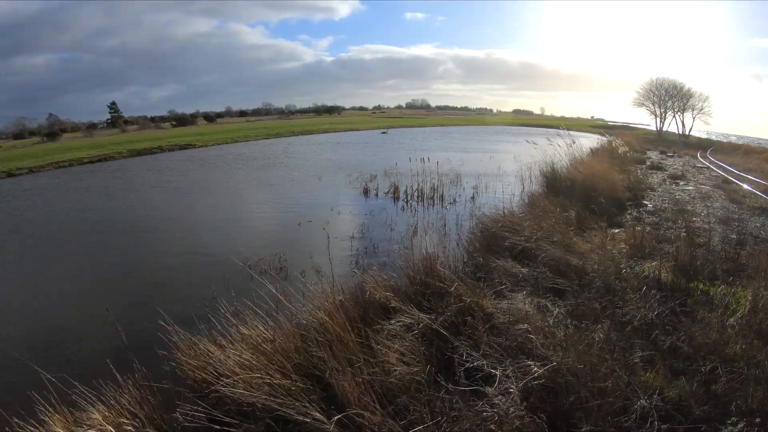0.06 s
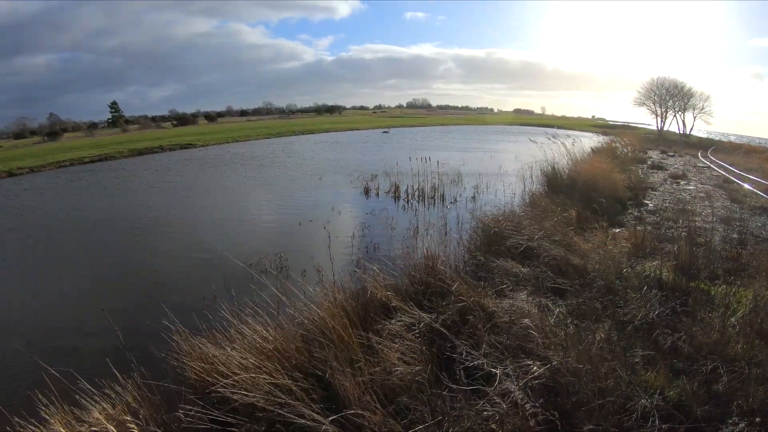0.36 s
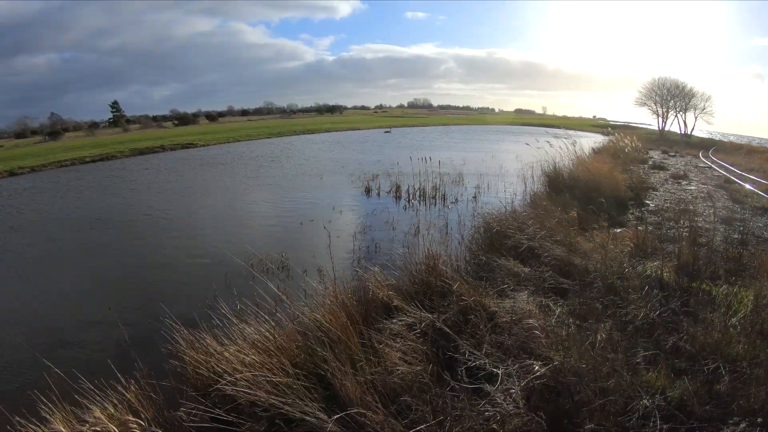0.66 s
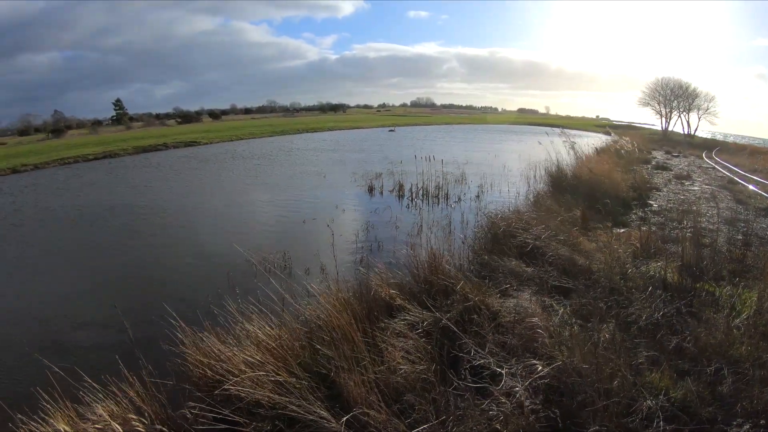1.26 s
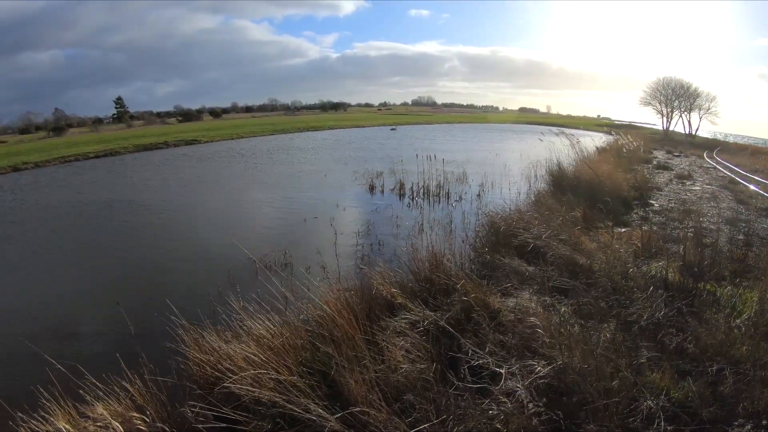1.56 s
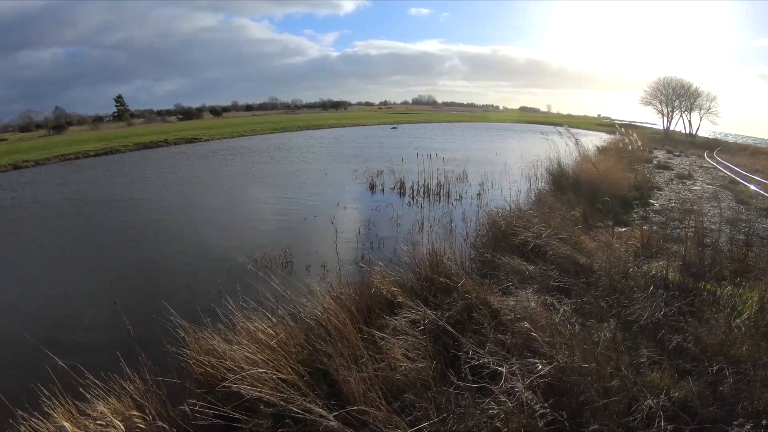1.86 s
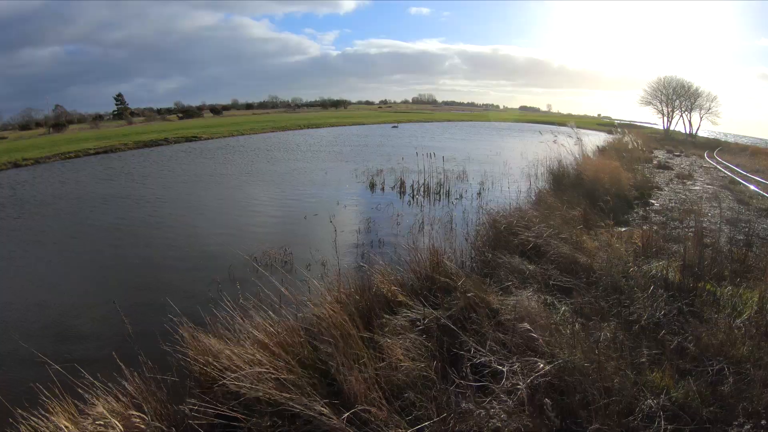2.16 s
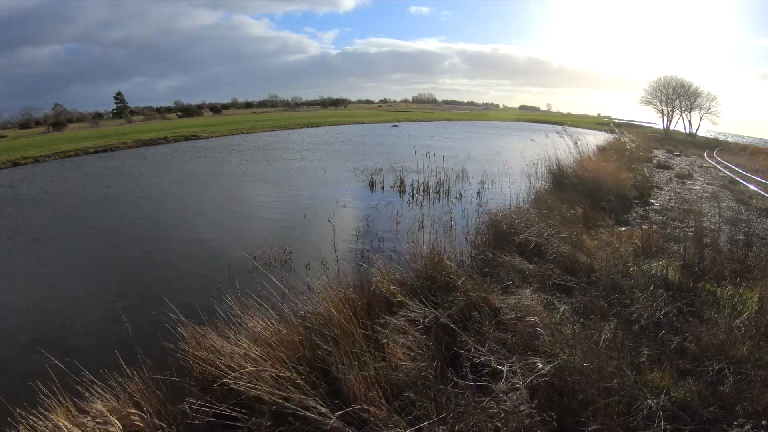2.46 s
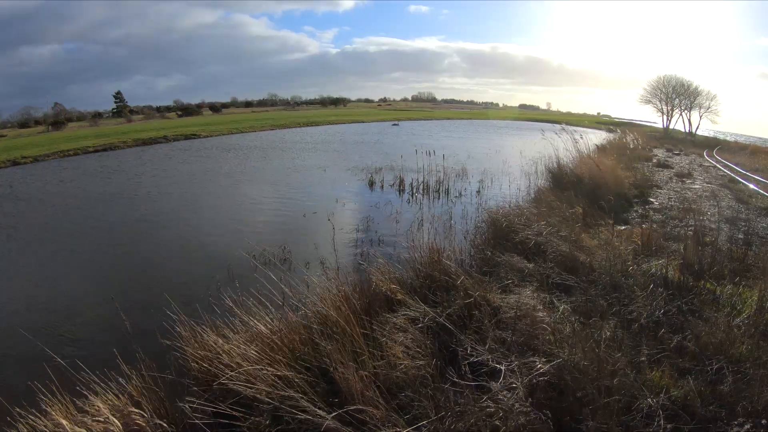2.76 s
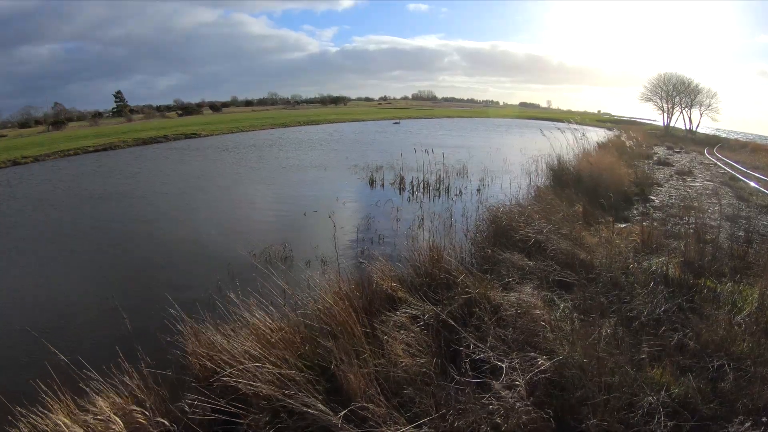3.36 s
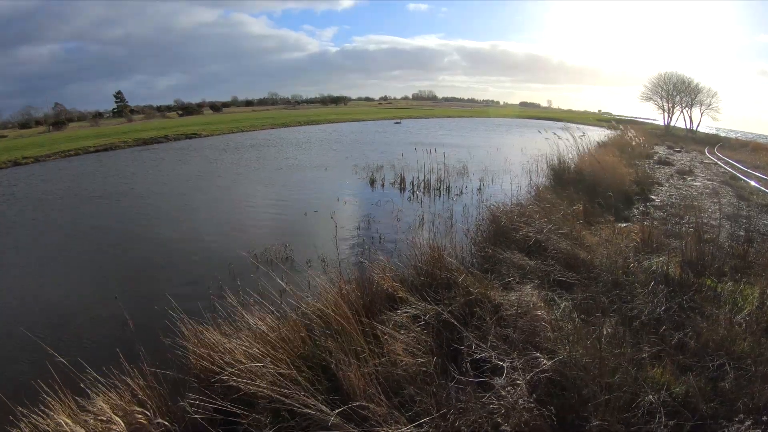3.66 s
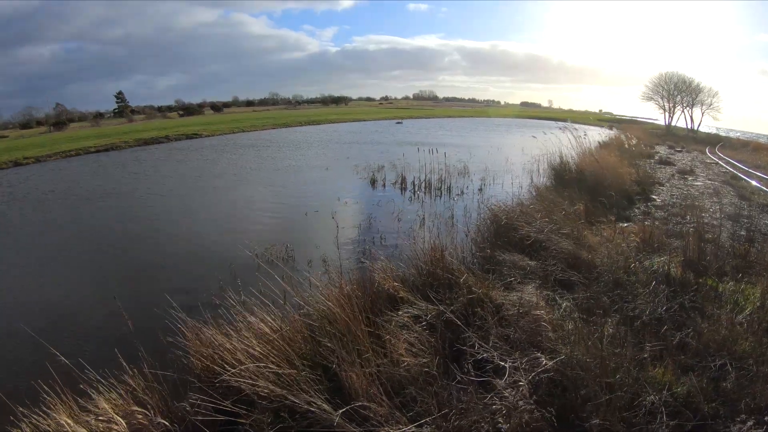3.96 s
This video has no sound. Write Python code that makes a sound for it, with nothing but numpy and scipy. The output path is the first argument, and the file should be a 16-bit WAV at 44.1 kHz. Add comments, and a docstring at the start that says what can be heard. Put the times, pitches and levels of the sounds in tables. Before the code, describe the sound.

Wind rumbles and thumps unevenly on the microphone over a constant rush of air beside a pond. Underneath, dry grass hisses and crackles softly, with a few faint reed ticks before the wind eases slightly.

```python
"""Wind on a grassy shore

Steady wind crosses open ground beside a pond. Turbulent air rushes over land and water, and dry
grass hisses by friction and crackles as it sways. In the stronger wind a dry reed stalk close by
ticks and scrapes. In front, eddies buffet the microphone with a rumble and low thumps."""
import sys
import numpy as np
from scipy import signal
from scipy.fft import rfft, irfft
from scipy.io import wavfile
from scipy.ndimage import map_coordinates

SR = 44100
rng = np.random.default_rng(int(sys.argv[2]) if len(sys.argv) > 2 else 0)


def wav_out(sig):
    """Save sig, one row per channel (or a flat mono array), as 16-bit PCM at SR to the path in sys.argv[1]."""
    wavfile.write(sys.argv[1], SR, np.round(np.clip(np.atleast_2d(sig).T, -1, 1) * 32767).astype(np.int16))


N = 176400


def undb(db):
    """Amplitude grows tenfold for every 20 dB of level."""
    return 10 ** (np.asarray(db) / 20)


def unit(x):
    """Normalisation to an rms of 1."""
    return x / np.sqrt(np.mean(x ** 2) + 1e-18)


def curve(rows):
    """Linear interpolation of (time [s], value) rows."""
    return np.interp(np.arange(N) / SR, *np.array(rows).T)


def colour(x, spectrum):
    """Spectral shaping by (frequency [Hz], gain [dB]) rows, normalised to an rms of 1."""
    hz, db = np.array(spectrum).T
    bin_hz = np.maximum(np.arange(len(x) // 2 + 1) * SR / len(x), 1)
    gain = undb(np.interp(np.log(bin_hz), np.log(hz), db))
    return unit(irfft(rfft(x) * gain, len(x)))


def noise(spectrum):
    """Filtered Gaussian noise, the sum of many independent sources."""
    return colour(rng.standard_normal(N), spectrum)


def waver(per_s):
    """Slow random modulation: a spline through per_s values a second, with an rms of 1."""
    return unit(map_coordinates(rng.standard_normal(2048), [np.arange(N) / SR * per_s], mode="wrap"))


def contacts(per_s, spread_db):
    """A Poisson process of tiny impacts, most weak and a few strong."""
    size = undb(spread_db * np.minimum(rng.exponential(size=N), 3))
    return (rng.random(N) < per_s / SR) * size * rng.choice([-1, 1], N)


def bursts(events, spectrum):
    """Noise pulses under Gaussian envelopes; each duration is the full width at half power."""
    out = np.zeros(N)
    for at, db, duration, pitch in events:
        span = slice(max(int((at - .15) * SR), 0), int((at + .15) * SR))
        t = np.arange(N)[span] / SR - at
        envelope = 2 ** (-2 * np.minimum((t / duration) ** 2, 20))
        carrier = colour(rng.standard_normal(16384), np.array(spectrum) * [pitch, 1])[:len(t)]
        out[span] += undb(db) * unit(carrier * envelope) * np.sqrt(np.mean(envelope ** 2))
    return out


def air_rush():
    """Distant turbulence radiates broadband noise whose half-octave bands fluctuate independently."""
    # air over land and water (frequency [Hz], spectral level [dB])
    spectrum = [(80, -21), (250, 2.5), (500, -0.5), (800, -1.5), (1150, -6.5), (1500, -10), (2200, -17),
                (3500, -18.5), (6000, -33), (15000, -84)]
    # strength of the rush (time [s], level [dB])
    level = [(0, -36.5), (.1, -39), (.25, -36.5), (.42, -37), (.58, -39.5), (.76, -37), (.93, -38),
             (1.07, -36), (1.22, -37.5), (1.5, -35.5), (1.95, -37), (2.12, -38), (2.33, -33.5), (2.44, -36),
             (2.56, -34.5), (2.74, -37), (3.04, -36), (3.28, -38), (3.48, -39), (3.72, -37.5), (3.95, -38)]
    # brightness as swells pass (time [s], treble lift [dB])
    tilt = [(0, 1), (1.1, 2), (2, 1), (2.6, -1.4), (3.4, 1.5), (3.7, 4), (4, 0.5)]
    air, tilt_db = rfft(noise(spectrum)), curve(tilt)
    bin_hz = np.maximum(np.arange(len(air)) * SR / N, 1)
    half_octaves = np.clip(2 * np.log2(bin_hz / 200), 0, 9)
    out = np.zeros(N)
    for band in range(10):
        share = np.maximum(1 - abs(half_octaves - band), 0)
        treble_weight = np.clip((band - 2) / 4, 0, 1)
        out += irfft(air * share, N) * undb(.5 * waver(per_s=7.77) + treble_weight * tilt_db)
    return unit(out) * undb(curve(level) + 3.5)


def dry_grass():
    """Friction of countless blades sums to a flickering hiss; nearer blades snap as single impulses."""
    # rubbing blades (frequency [Hz], spectral level [dB])
    hiss_spectrum = [(1200, -10), (2200, -8.5), (2750, 0.5), (3300, -5.5), (4200, -1), (5500, -5.5),
                     (6800, -6.5), (8200, -13.5), (10000, -13), (12500, -24.5), (15500, -32)]
    # strength of their hiss (time [s], level [dB])
    hiss_level = [(0, -49.5), (.6, -50.5), (1.05, -49.5), (1.45, -48.5), (1.7, -51.5), (1.92, -48.5),
                  (2.15, -49.5), (2.35, -48.5), (2.8, -50.5), (3.3, -49.5), (3.7, -50.5), (4, -50)]
    # thinnest blades and seed heads (frequency [Hz], spectral level [dB])
    fine_spectrum = [(4000, -20), (7000, 2), (10000, -1.5), (12500, -5.5), (15500, -13)]
    # strength of the fine hiss and the snaps (time [s], level [dB])
    fine_level = [(0, -55), (.45, -60.5), (1, -57), (1.2, -60), (1.42, -57), (1.65, -58.5), (1.93, -56),
                  (2.15, -57.5), (2.52, -55), (2.9, -58), (3.3, -59), (3.7, -62), (4, -60)]
    # snap of one blade (frequency [Hz], spectral level [dB])
    snap_spectrum = [(500, -40), (2000, -12), (5000, 1), (9000, 7), (12000, -3), (15500, -5)]
    flicker = undb(.94 * waver(per_s=37))
    hiss = noise(hiss_spectrum) * undb(curve(hiss_level) + 3.5)
    snaps = colour(contacts(per_s=70, spread_db=6.5), snap_spectrum) * undb(-7.5)
    fine = (noise(fine_spectrum) * undb(3.5) + snaps) * undb(curve(fine_level))
    return (hiss + fine) * flicker


def reed_stalk():
    """Impact and friction excite a stalk's resonances: ticks, each a crack within a rub, and scraping."""
    # response of the stalk (frequency [Hz], gain [dB])
    body = [(500, -45), (1200, -26), (2100, -5), (2700, -5.5), (3300, 1), (3950, 3), (4550, -2),
            (5300, -21.5), (8000, -17), (16000, -60)]
    # ticks (time [s], level [dB], duration [s], frequency ratio)
    ticks = [(.446, -37, .008, 1.05), (.4572, -39, 0.0035, 1.2), (.54, -33, .0032, 1.07),
             (1.048, -36, .005, .9), (1.07, -42, .0036, 0.91), (1.116, -39, .003, 1.03),
             (1.2358, -35, .004, .9), (1.2827, -31, .0016, 0.93), (1.287, -35, 0.0018, 1),
             (1.3095, -32, 0.0019, 1), (1.3185, -32.5, .003, 1.05), (1.406, -36, 0.0054, 0.99),
             (1.412, -38, .0043, 0.85), (1.733, -36, 0.011, 0.88), (1.743, -34.5, 0.0032, 1.06),
             (2.006, -35, .0037, 0.98), (2.0223, -35.5, .0036, 1), (2.047, -34.5, .0035, 1.1),
             (2.2082, -36, 0.0016, 1.2), (2.306, -40, .0061, 1.1), (2.3132, -27.5, 0.0013, 0.89),
             (2.37, -32, 0.0029, 1.03), (2.426, -33.5, .0018, 1.05)]
    # scraping, which fades as the wind drops (time [s], level [dB])
    scrape_level = [(0, -68), (.38, -57), (.5, -45), (.65, -53), (1.08, -54), (1.4, -49), (1.65, -54.5),
                    (2, -45), (2.38, -56), (2.5, -59), (4, -58)]
    drag = undb(curve(scrape_level) + 2 * waver(per_s=25.18))
    scrape = colour(contacts(per_s=600, spread_db=2), body) * drag
    impulses = np.zeros(N)
    for at, db, *_ in ticks:
        impulses[int(at * SR)] = undb(db)
    cracks = colour(impulses, body) * undb(-58)
    rubs = bursts(ticks, body) * undb(-2.5)
    return cracks + rubs + scrape


def buffeting():
    """Turbulent pressure on the microphone rumbles and thumps; smaller eddies sound higher."""
    # strength of the wind at the microphone (time [s], level [dB])
    wind_level = [(0, -22.5), (.18, -22), (.32, -20), (.6, -20.5), (.8, -23.5), (.92, -17.5), (1.2, -22.5),
                  (1.38, -19), (1.6, -21.5), (1.95, -19.5), (2.36, -21), (2.5, -25), (2.66, -25.5),
                  (2.88, -25), (3.05, -22.5), (3.2, -23), (3.33, -27), (3.42, -19), (3.53, -24.5),
                  (3.7, -20.5), (3.83, -25.5), (4, -25.5)]
    # rumble of the flow (frequency [Hz], spectral level [dB])
    rumble_spectrum = [(12, -33), (22, -19), (40, 1), (65, -3), (100, -3.5), (160, -11), (300, -20.5),
                       (600, -37.5), (1500, -40.5), (4000, -67), (16000, -110)]
    # small, fast whirls (frequency [Hz], spectral level [dB])
    whirl_spectrum = [(40, -35), (110, -1), (170, 1), (250, -6), (420, -11.5), (700, -21.5), (2000, -53),
                      (16000, -100)]
    # strong eddies (time [s], level [dB], duration [s], frequency ratio)
    eddies = [(.28, -13, 0.039, 1.2), (.347, -10.5, .016, 1.83), (.485, -16.5, 0.057, 1.97),
              (.591, -13, 0.022, 0.8), (.715, -13.5, 0.026, 0.84), (.927, -12, 0.04, 0.5),
              (1.14, -21, 0.028, 4.2), (1.145, -7.5, 0.02, 1.16), (1.374, -10.5, 0.049, 0.964),
              (1.437, -14.5, 0.012, 1), (1.46, -28.5, 0.089, 5.3), (1.489, -14.5, 0.024, 1.3),
              (1.702, -13.5, 0.017, 0.83), (1.892, -14, 0.036, 0.81), (2.027, -14.5, 0.045, 0.67),
              (2.159, -11, 0.026, 0.81), (2.162, -18, 0.016, 3.9), (2.336, -11, 0.02, 1.04),
              (2.63, -20.5, .025, 1.1), (2.76, -22, 0.065, 1.55), (3.04, -16.5, 0.023, 1.25),
              (3.113, -11.5, 0.021, 1.13), (3.22, -18, 0.048, 0.78), (3.27, -13.5, 0.012, 1.58),
              (3.757, -11, 0.03, 1.03)]
    # thump of one eddy (frequency [Hz], spectral level [dB])
    eddy_spectrum = [(15, -30), (35, -3), (70, 3.5), (110, -3), (170, -18), (280, -25), (700, -53),
                     (3000, -80)]
    wind_db = curve(wind_level)
    gust_db = wind_db - wind_db.mean()
    flutter = unit(undb(2 * waver(per_s=38)))
    rumble = noise(rumble_spectrum) * undb(wind_db - 1.5)
    whirls = noise(whirl_spectrum) * undb(1.04 * gust_db - 30)
    thumps = bursts(eddies, eddy_spectrum) * undb(-3.5)
    return (rumble + whirls) * flutter + thumps


def scene():
    """Superposition: the pressures of the four sources add in one channel."""
    return (buffeting() + air_rush() + dry_grass() + reed_stalk())[None]


def record(dry):
    """Band limiting: a steep elliptic low-pass filter removes the highest treble."""
    cutoff_hz = 15750
    return signal.sosfilt(signal.ellip(10, .2, 80, cutoff_hz, fs=SR, output="sos"), dry)


dry = scene()
out = record(dry)
wav_out(out)
```